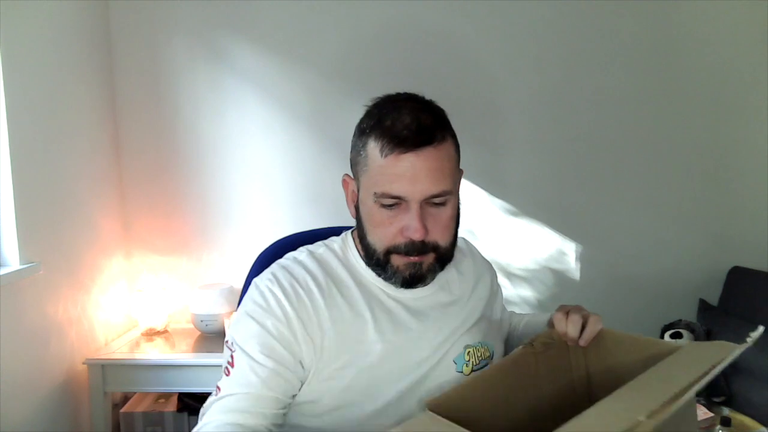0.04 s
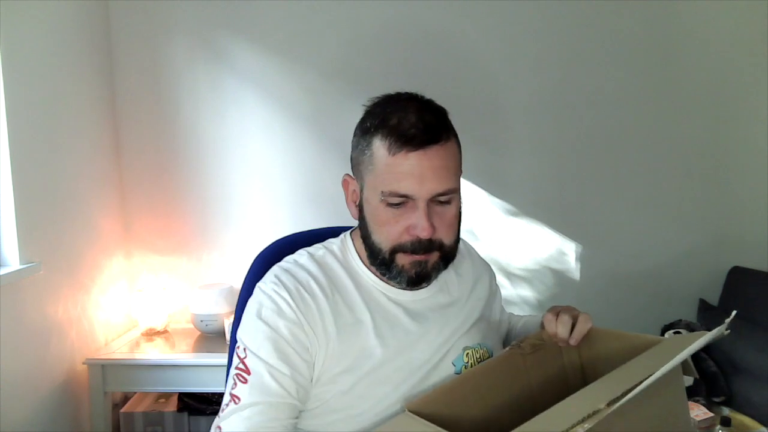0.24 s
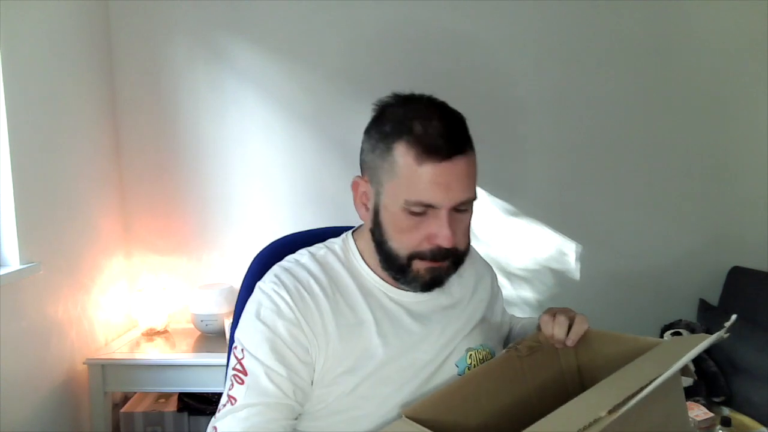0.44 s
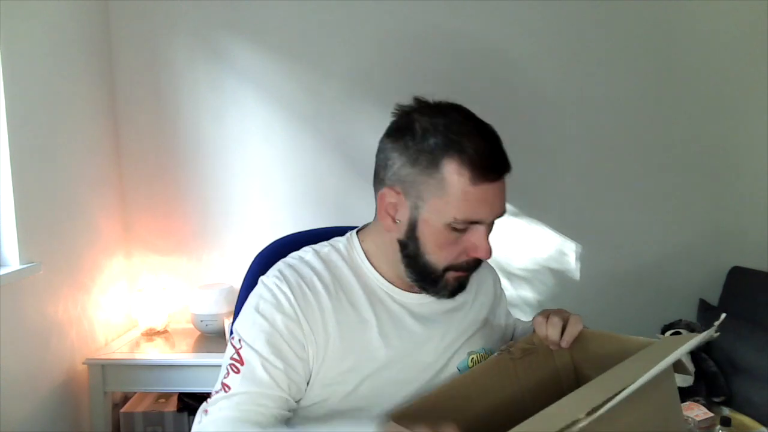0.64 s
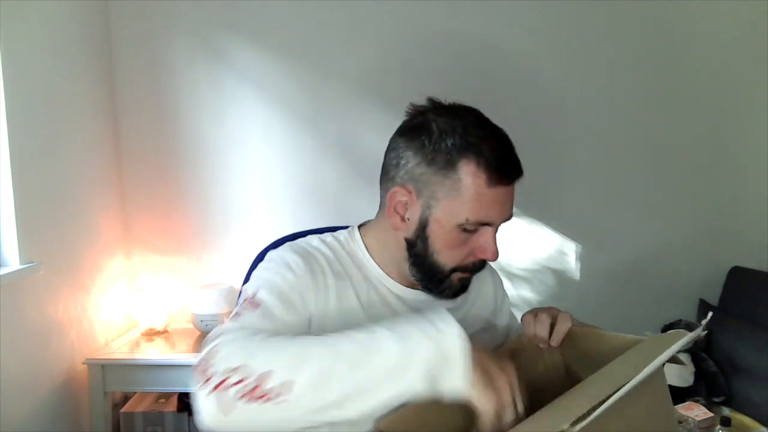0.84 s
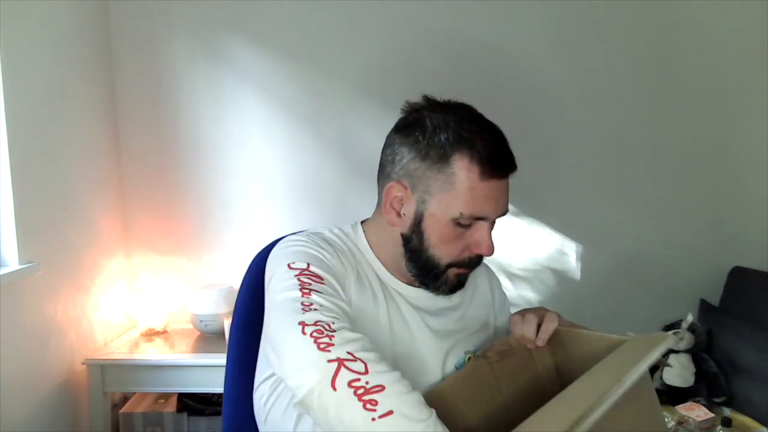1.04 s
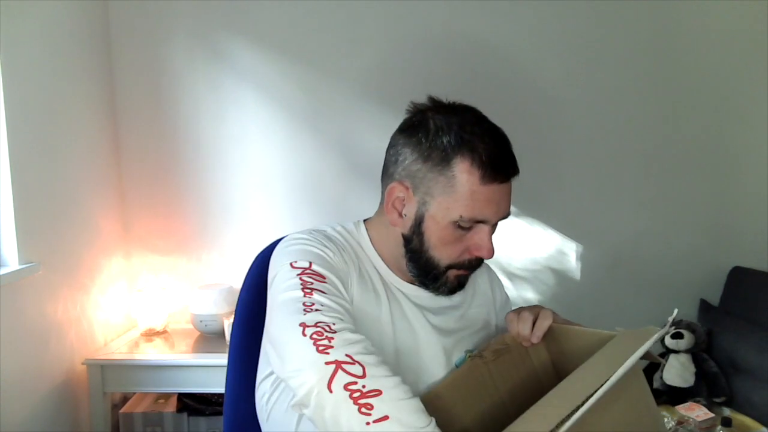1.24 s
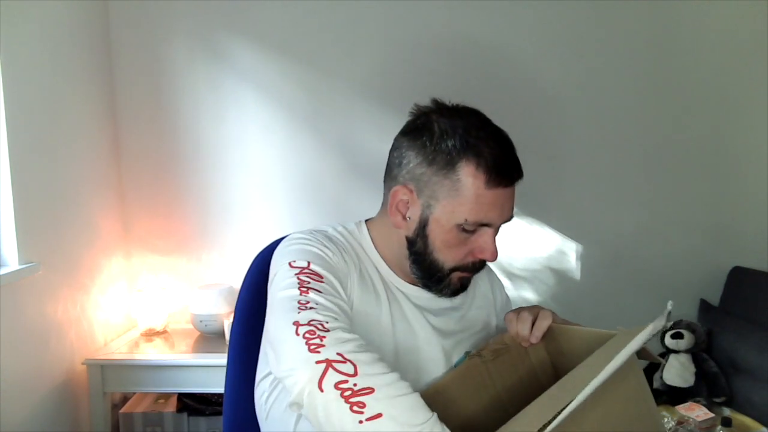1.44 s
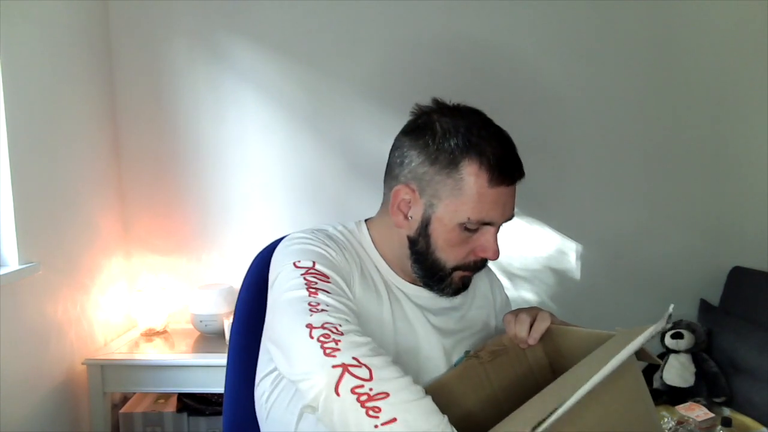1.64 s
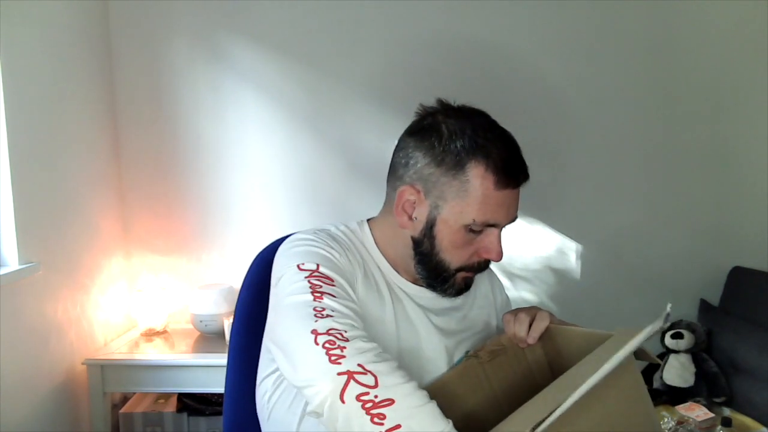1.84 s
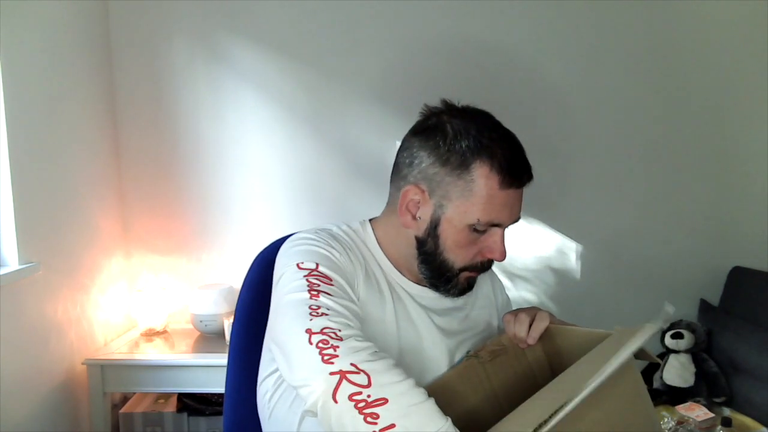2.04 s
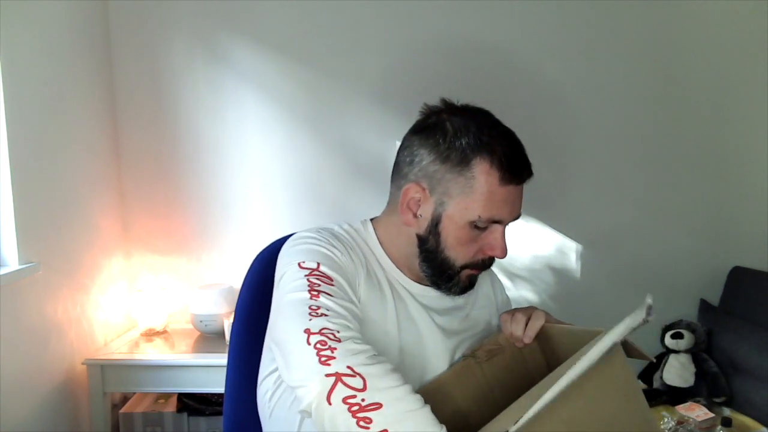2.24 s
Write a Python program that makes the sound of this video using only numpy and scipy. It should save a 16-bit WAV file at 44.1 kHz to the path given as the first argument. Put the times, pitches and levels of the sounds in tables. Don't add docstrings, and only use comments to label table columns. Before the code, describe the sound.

Packing paper crinkles softly in a cardboard box, two knocks follow as items land on a desk, then rummaging grows with hollow box thumps and a loud crisp rustle; close stereo microphone, quiet small room.

```python
import sys
import numpy as np
from scipy import signal
from scipy.fft import rfft, irfft
from scipy.io import wavfile
from scipy.ndimage import uniform_filter1d

SR = 44100
rng = np.random.default_rng(int(sys.argv[2]) if len(sys.argv) > 2 else 0)


def generate_wav(signal):
    frames = np.transpose(np.atleast_2d(signal))
    scaled = np.clip(frames, -1, 1) * 32767
    pcm = np.round(scaled).astype(np.int16)
    wavfile.write(sys.argv[1], SR, pcm)


def attenuation_scalar(level_db):
    decades = np.asarray(level_db, float) / 20
    return 10 ** decades


N = 101429

# (frequency [Hz], density [dB per Hz])
AIR_SPECTRUM = [(12, -22), (20, -25.5), (36, -20), (76, -42), (948, -48), (2680, -58), (3490, -59),
                (5490, -45.5), (11600, -61.5), (15000, -109), (22000, -120)]
# (frequency [Hz], t60 [s])
ROOM_DECAY = [(100, 0.27), (500, 0.22), (2000, 0.21), (8000, 0.13)]
# (frequency [Hz], side minus mid [dB])
STEREO_WIDTH = [(60, -63), (130, -24), (270, -35), (560, -14), (1190, -12), (2500, -3.5), (5270, 0.5),
                (11100, -1.5)]
# (frequency [Hz], left minus right [dB])
STEREO_TILT = [(1000, 0), (4000, 1.5), (9000, -2)]
# (time [s], edge [Hz])
TREBLE_EDGE = [(1.74, 12000), (1.755, 11200), (1.795, 10700), (1.8, 10400), (1.835, 10500), (1.84, 11800),
               (1.95, 11100)]
# (time [s], frequency [Hz], level
# [dB], length [s])
SQUEAKS = [(0.611, 641, -52.5, 0.064), (0.002, 137.6, -38.5, 0.19), (1.52, 3060, -53, 0.022),
           (2.241, 1163, -44.5, 0.057), (2.244, 2294, -43, 0.043), (2.255, 2744, -44, 0.026)]
# (time [s], frequency [Hz], level [dB], t60 [s])
FLAPS = [(0, 315, -38.5, 0.063), (0.939, 235, -39.5, 0.083), (0.961, 250, -40.5, 0.058),
         (.99, 220, -31, 0.085), (1.045, 258.6, -36, 0.11), (1.214, 255, -40.5, 0.23), (1.234, 71, -47, .3),
         (1.278, 77, -39, 0.25), (1.411, 134, -41, 0.14), (.5, 70, -53, .25), (0.781, 164, -52, 0.34),
         (1.316, 297, -41, 0.12), (1.56, 257, -35.5, 0.04), (1.634, 311, -43, 0.059),
         (1.659, 238, -31, 0.08), (1.728, 203, -35, .1), (1.77, 264, -33, 0.13), (1.82, 206, -27, 0.13),
         (1.84, 70, -37, .3), (1.839, 465, -37, 0.055), (1.89, 70, -45, .25), (1.89, 445, -41, 0.075),
         (2.021, 302, -31.5, .08)]
# (time [s], main panel [dB], deep panel [dB], upper panels [dB], push
# length [s])
PUSHES = [(0, -40.5, -45, -41, 0.12), (.56, -51, -55, -54.5, 0.16), (.69, -53, -51, -54, 0.1),
          (.77, -57.5, -69, -56.5, 0.052), (.83, -74.5, -64, -62, 0.082), (.938, -48.5, -43, -68, 0.013),
          (.968, -34.5, -64, -57, 0.013), (.988, -31, -43, -43, 0.021), (1.04, -48, -36, -56, 0.059),
          (1.11, -46, -43.5, -43, 0.22), (1.214, -36.5, -38, -44, 0.028), (1.31, -36, -52, -57, 0.048),
          (1.365, -49, -36, -48, 0.051), (1.415, -43.5, -51, -46, 0.058),
          (1.522, -36.5, -29.5, -47.5, 0.058), (1.558, -37.5, -40, -43.5, 0.096),
          (1.63, -34, -35, -34, 0.067), (1.73, -50, -66, -48.5, 0.052), (1.77, -32.5, -44, -53.5, 0.083),
          (1.805, -44, -49, -33.5, 0.053), (1.966, -26, -26.5, -25.5, 0.017),
          (2.015, -34, -32, -34.5, 0.026), (2.07, -48.5, -41.5, -48.5, 0.12),
          (2.235, -50.5, -46.5, -75, 0.062),
          (.29, -76, -47.5, -51, 0.034), (1.887, -66, -56, -50, 0.12), (2.13, -65, -62, -58.5, 0.1)]
# (frequency [Hz], level [dB], t60 [s])
DEEP_PANEL = (67.9, 0, 0.22)
# (frequency [Hz], level [dB], t60 [s])
MAIN_PANEL = (130.6, 0, .16)
# (frequency [Hz], level [dB], t60 [s])
UPPER_PANELS = [(176, -11.5, 0.12), (261.4, -2.5, 0.086), (317, -8, 0.16), (414.2, -10.5, 0.14),
                (471.3, -22, 0.6), (689, -13, 0.1)]
# (time [s], centre [Hz], bandwidth [Hz], level [dB], length [s])
FOLDS = [(0.607, 6940, 4600, -46, 0.085), (0.612, 1250, 216, -55.5, 0.061), (1.527, 5600, 2470, -47, 0.011),
         (1.74, 2052, 972, -39, 0.026), (1.735, 8000, 2000, -39.5, 0.044), (0.77, 7000, 911, -56, .03),
         (0.936, 5100, 1300, -44, 0.026), (1.365, 5833, 2000, -54, 0.046), (1.838, 6440, 2500, -36, 0.017),
         (1.954, 2400, 463, -46, 0.018), (1.955, 7750, 1200, -50, 0.083), (2.002, 3270, 730, -45, 0.052),
         (2.03, 3470, 555.6, -49, 0.047), (2.003, 7407, 370.4, -47, 0.023),
         (2.016, 6100, 1400, -38.5, 0.03), (2.045, 6200, 900, -50.5, 0.055),
         (2.072, 2420, 440, -50.5, 0.041)]
# (time [s], level [dB], crack level [dB], contact time [s])
KNOCKS = [
    (0.2007, -15.5, -49, 0.00017),
    (0.3962, -7.5, -23.5, 0.0012),
]
# (frequency [Hz], level [dB], t60 [s])
DESK_MODE = (111.5, -8, 0.084)
# (frequency [Hz], level [dB], t60 [s])
SOFT_ITEM = [(130.5, -2.5, .13), (235, 7, 0.036), (319, 5, 0.056), (390, -3, 0.055), (549, 1, 0.032),
             (759, -0.5, 0.032), (973, -16.5, 0.029), (1140, -17, 0.04), (1588, -17.5, .03),
             (1770, -25.5, 0.044)]
# (frequency [Hz], level [dB], t60 [s])
HARD_ITEM = [(132.4, -4.5, 0.038), (255, -12, 0.11), (339, -1, 0.044), (462, 3.5, 0.052), (523.6, 8, 0.046),
             (730, 10, 0.043), (895, -8, 0.054), (1160, -18, 0.044), (1267, -8.5, 0.089),
             (1420, -10, 0.078), (1528, 3, 0.051), (1686, -29, .06), (2186, -2.5, 0.066),
             (2280, 12.5, 0.037)]
# (delay [s], level [dB])
SOFT_BOUNCES = [(0.02, -27), (0.03, -18), (0.057, -23), (.068, -28)]
# (delay [s], level [dB])
HARD_BOUNCES = [(.007, -9.5), (.017, -20), (0.0227, -12.5), (.0328, -20), (.057, -33.5), (.069, -26)]
# (time [s], level [dB], low rasp re level [dB], rise [s], t60 [s])
CRUMPLES = [(0, -44, -2.5, 0.0026, 0.4), (0.148, -48.5, -8.5, 0.038, .3), (0.1974, -37, -8, 0.0031, 0.77),
            (0.309, -40, -6.5, 0.024, 1), (0.394, -32, 11.5, 0.0039, 0.19), (0.583, -44, -15, 0.008, 0.21),
            (0.604, -40.5, -16, 0.013, 0.42), (0.761, -43.5, -5.5, 0.03, 0.28),
            (0.934, -36, -8, 0.0088, 0.66), (1.016, -41.5, 4.5, 0.002, 0.19),
            (1.116, -43, -6.5, 0.0031, 0.6), (1.15, -52, 8, 0.0034, 0.33), (1.219, -44.5, -4, 0.015, 0.59),
            (1.312, -46.5, 4.5, 0.0045, 0.75), (1.361, -39.5, -1, 0.04, 0.26),
            (1.524, -43, -6.5, 0.0058, 1), (1.623, -43.5, 3, 0.0053, 0.53), (1.73, -30, -4, 0.0033, 0.45),
            (1.836, -23.5, -8, 0.0019, 0.29), (1.951, -34.5, -2, 0.002, 0.31),
            (2.001, -33.5, -6.5, 0.0063, 0.43), (2.071, -46.5, 3.5, 0.0053, 1),
            (2.176, -38.5, -17.5, 0.044, 1), (2.222, -36.5, -4, 0.017, 1)]
# (frequency [Hz], density [dB per Hz])
HISS_SPECTRUM = [(1880, -10.5), (3200, -6.5), (3640, -6.5), (4370, -6.5), (6400, -2), (7130, -4.5),
                 (9130, -8), (11600, -22), (15000, -44), (22000, -120)]
# (frequency [Hz], density [dB per Hz])
RASP_SPECTRUM = [(240, 4), (400, -2.5), (693, 1), (821, -1.5), (1130, 3.5), (2120, -4), (2460, -7.5),
                 (5000, -15.5), (6500, -19.5), (11000, -120)]


def evened(x):
    return x / np.sqrt(np.mean(x ** 2) + 1e-20)


def read(points, hz):
    f, value = np.transpose(points)
    return np.interp(np.log(hz + 1), np.log(f + 1), value)


def colour(x, points):
    size = 2 ** 17
    gain = attenuation_scalar(read(points, np.fft.rfftfreq(size, 1 / SR)))
    return irfft(rfft(x, size) * gain, size)[..., :N]


def ring(modes, detune=0, swing=-1):
    t = np.arange(SR // 2) / SR
    total = np.zeros(len(t))
    for k, (hz, db, t60) in enumerate(modes):
        total += swing ** k * attenuation_scalar(db - 60 * t / t60) * np.sin(2 * np.pi * hz * (1 + detune) * t)
    return total


def swell(s, rise, t60):
    t = np.arange(N) / SR - s
    attack = np.clip(t / max(rise, 1e-4), 0, 1)
    return attack * attenuation_scalar(-60 * np.clip(t - rise, 0, 3) / max(t60, 0.01))


def air():
    return attenuation_scalar(-60.5) * evened(colour(rng.standard_normal((2, N)), AIR_SPECTRUM))


def room(x):
    taps = np.zeros((2, SR // 2))
    slots = np.arange(200, SR // 2 - 20, 20)
    at = slots + rng.integers(0, 20, (2, len(slots)))
    np.put_along_axis(taps, at, rng.choice([-1., 1.], at.shape), 1)
    hz, t, z = signal.stft(taps, SR, nperseg=256)
    decay = attenuation_scalar(-60 * t / read(ROOM_DECAY, hz)[:, None])
    tail = signal.istft(z * decay, SR, nperseg=256)[1]
    return signal.fftconvolve(x[None], tail / np.linalg.norm(tail[0]), axes=1)[:, :N]


def squeaks():
    out, t = np.zeros(N), np.arange(N) / SR
    for s, hz, db, length in SQUEAKS:
        fuzz = 1 + 0.5 * evened(uniform_filter1d(rng.standard_normal(N), size=300))
        arch = np.sin(np.pi * np.clip((t - s) / length, 0, 1))
        out += attenuation_scalar(db) * fuzz * np.sin(2 * np.pi * hz * t) * arch
    return out


def flaps():
    out, t = np.zeros(N), np.arange(N) / SR
    for s, hz, db, t60 in FLAPS:
        out += attenuation_scalar(db) * swell(s, 0.013, t60) * np.sin(2 * np.pi * hz * (t - s))
    return out


def box():
    out = np.zeros(N)
    rub = rng.standard_normal(N) * (rng.random(N) < 1100 / SR)
    pushes = PUSHES
    bends = rng.uniform(-1.22, 1, len(pushes))
    for (s, *levels_db, length), bend in zip(pushes, bends):
        at = round(s * SR)
        drive = (rub * swell(s, 0.0083, 3 * length))[at:][:SR // 2]
        panels = ring([MAIN_PANEL]), ring([DEEP_PANEL]), ring(UPPER_PANELS, 0.058 * bend)
        for db, panel in zip(levels_db, panels):
            boom = signal.fftconvolve(drive, panel)[:N - at]
            out[at:at + len(boom)] += attenuation_scalar(db + 4.5) * boom / (np.abs(boom).max() + 1e-9)
    return out


def folds():
    out = np.zeros((2, N))
    clumps = (rng.random(N) < 0.04) * rng.exponential(1.3, N)
    cracks = rng.standard_normal((2, N)) * (0.52 + clumps)
    for s, hz, width_hz, db, length in FOLDS:
        edges_hz = [hz - width_hz / 2, hz + width_hz / 2]
        band = signal.sosfilt(signal.butter(3, edges_hz, "band", fs=SR, output="sos"), cracks)
        out += attenuation_scalar(db) * evened(band) * swell(s, 0.22 * length, 3 * length)
    return out


def knocks():
    out, t = np.zeros(N), np.arange(SR // 2) / SR
    build_s, ring_cap_s, crack_t60_s = 0.0018, 0.1, 0.007
    items = (SOFT_ITEM, 1, SOFT_BOUNCES), (HARD_ITEM, -1, HARD_BOUNCES)
    for (s, db, crack_db, contact), (modes, swing, bounces) in zip(KNOCKS, items):
        blow = t[:400] * np.exp(-4 * t[:400] / contact)
        damped = [(hz, mode_db, min(t60, ring_cap_s)) for hz, mode_db, t60 in modes]
        body = ring([DESK_MODE]) + ring(damped, 0, swing)
        struck = signal.fftconvolve(body, blow / blow.sum())[:len(t)]
        sound = -struck * attenuation_scalar(db) * (1 - np.exp(-t / build_s))
        crack = signal.lfilter([0.2], [1, -1.72, 0.78], rng.standard_normal(len(t)))
        crack = crack * attenuation_scalar(crack_db - 60 * t / crack_t60_s)
        for delay, bounce_db in [(0.00065, 0)] + bounces:
            out[round((s + delay) * SR):][:len(t)] += attenuation_scalar(bounce_db) * (sound + crack)
    return out


def drift(shape, bins, frames):
    smooth = uniform_filter1d(rng.standard_normal(shape), size=bins, axis=0)
    return evened(uniform_filter1d(smooth, size=frames, axis=1))


def fibres(points):
    grains_per_s, spread_db, patch_db, sheet_db = 6000, 2.2, 1.1, 2.2
    size = attenuation_scalar(spread_db * np.minimum(rng.exponential(1, N), 5))
    grains = size * (rng.random(N) < grains_per_s / SR)
    cracks = rng.standard_normal((2, N)) * (0.45 + grains)
    z = signal.stft(cracks, nperseg=512, noverlap=384)[2]
    patches, sheet = drift(z.shape[1:], 9, 12), drift(z.shape[1:], 2, 24)
    z = z * attenuation_scalar(patch_db * patches + sheet_db * sheet)
    return evened(colour(signal.istft(z, nperseg=512, noverlap=384)[1][:, :N], points))


def paper():
    snap_db, snap_t60_s = -4.5, 0.015
    hiss, rasp = np.full((2, N), 1e-14)
    for s, db, low_db, rise, t60 in CRUMPLES:
        snap = attenuation_scalar(snap_db) * swell(s, rise, snap_t60_s)
        power = swell(s, rise, t60) ** 2 + snap ** 2
        hiss += attenuation_scalar(2 * db - 19) * power
        rasp += attenuation_scalar(2 * (db + low_db) - 9.5) * power
    return np.sqrt(hiss) * fibres(HISS_SPECTRUM) + np.sqrt(rasp) * fibres(RASP_SPECTRUM)


def scene():
    hits, boom, sheet = knocks(), box() + squeaks() + flaps(), paper()
    near = sheet + folds()
    near[0] += hits + boom
    near = near + attenuation_scalar(-10) * room(sheet[0])
    near = near + attenuation_scalar([[-12], [-4]]) * room(hits)
    near = near + attenuation_scalar([[-22], [-1]]) * room(boom)
    low_cut = signal.butter(2, 60, "high", fs=SR, output="sos")
    mid, side = air() + signal.sosfilt(low_cut, near)
    side = colour(side, STEREO_WIDTH)
    left = colour(mid + side, [(hz, db / 2) for hz, db in STEREO_TILT])
    right = colour(mid - side, [(hz, -db / 2) for hz, db in STEREO_TILT])
    return np.array([left, right])


def top_cut(x):
    return signal.sosfilt(signal.butter(12, 15720, fs=SR, output="sos"), x)


def record(dry):
    hz, t, z = signal.stft(dry, SR, nperseg=1024)
    edge_hz = np.interp(t, *np.transpose(TREBLE_EDGE), left=SR, right=SR)
    lost = hz[:, None] > edge_hz
    kept = signal.istft(z * ~lost, SR, nperseg=1024)[1][:, :N]
    mix = kept - 0.0079
    return top_cut(mix)


dry = scene()
out = record(dry)
generate_wav(out)
```